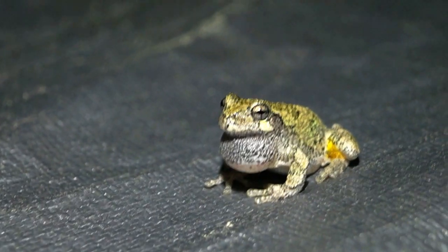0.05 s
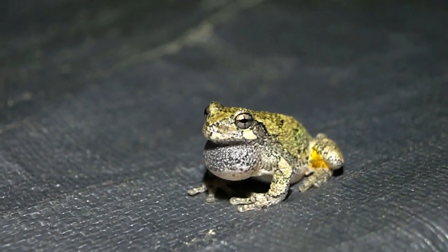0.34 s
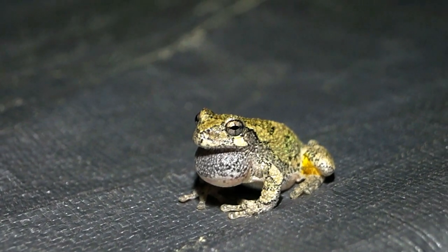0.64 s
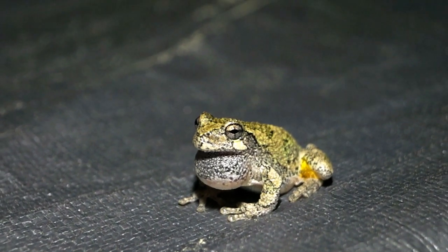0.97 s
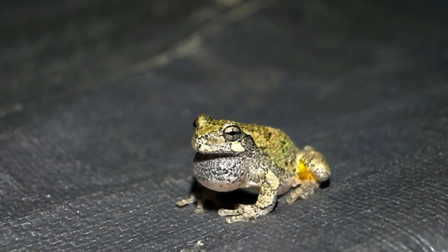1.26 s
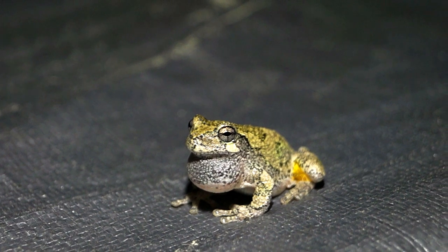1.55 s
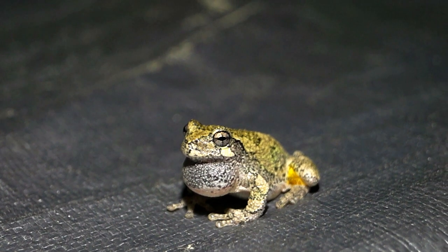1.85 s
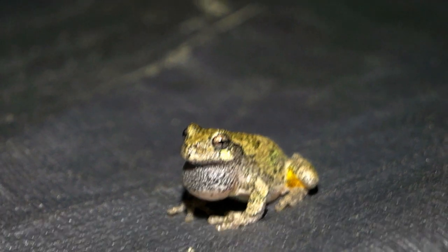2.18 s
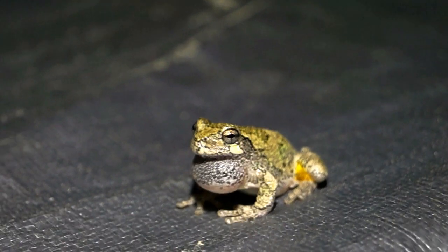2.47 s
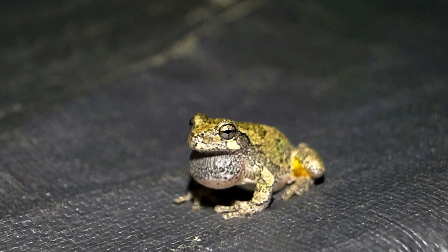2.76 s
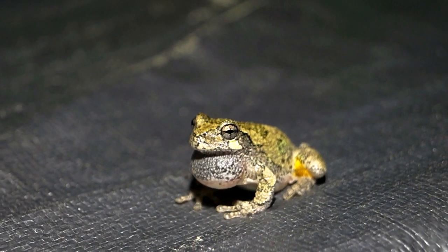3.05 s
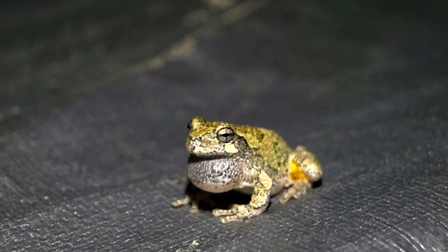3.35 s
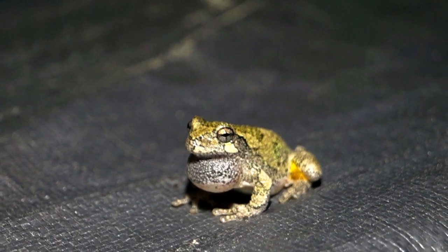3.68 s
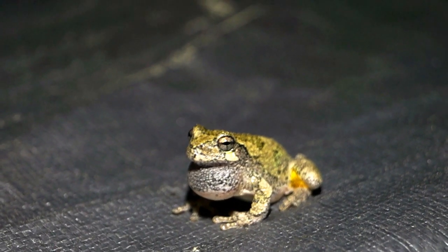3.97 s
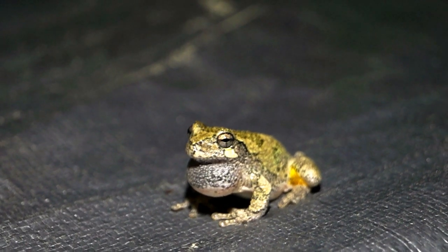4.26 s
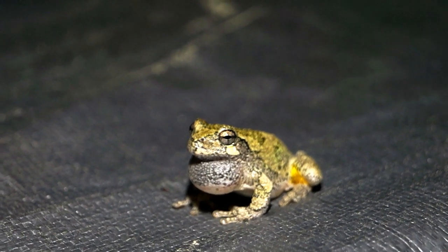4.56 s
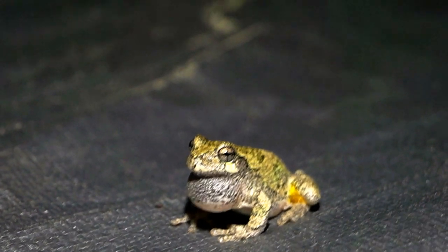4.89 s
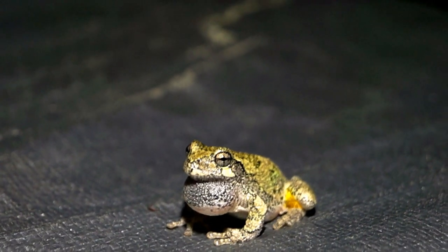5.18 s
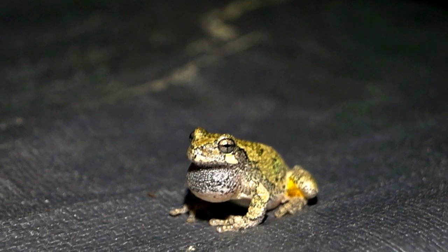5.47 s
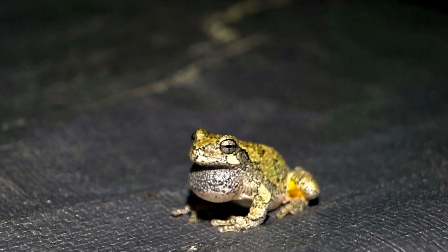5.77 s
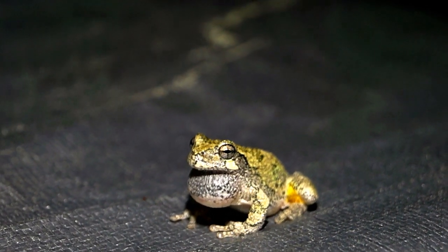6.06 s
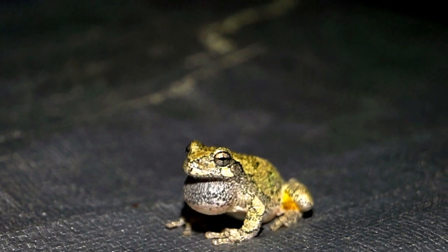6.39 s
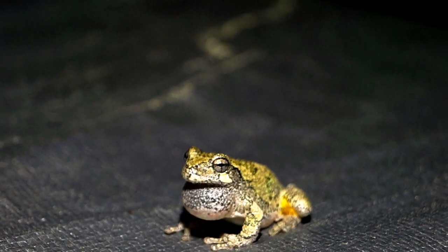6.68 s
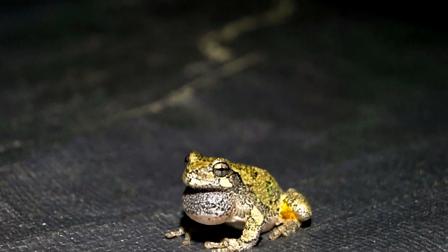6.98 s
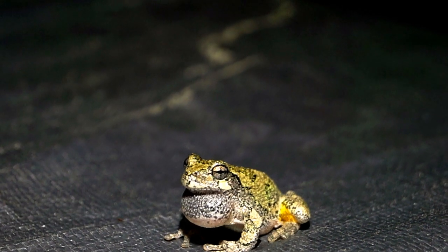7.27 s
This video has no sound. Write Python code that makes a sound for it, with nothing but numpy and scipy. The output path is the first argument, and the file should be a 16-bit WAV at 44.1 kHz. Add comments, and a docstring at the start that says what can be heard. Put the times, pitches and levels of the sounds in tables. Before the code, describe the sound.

Outdoors at night, a handheld microphone picks up three tree frogs taking turns with loud, pulsing trills, each about half a second long, with a slight echo from the trees. Soft handling thumps come early on. Later a small splash sounds as a toad begins a long, even, whistling trill behind the frogs, and a second plop follows near the end. Distant frogs, quiet air and a faint motor fill the gaps.

```python
"""Three gray tree frogs trill at night by the water. Each pulse is a rising chirp of the vocal cords,
coloured by the throat sac and echoed by things close by. Past the middle a toad starts a long, fast
trill and something plops twice in the water. Behind them are night air, a far motor, frog calls ringing
in the woods and the low rumble of a hand holding a camera. The yard and the trees add a faint tail."""
import sys
import numpy as np
from scipy import signal
from scipy.fft import rfft, irfft, next_fast_len
from scipy.io import wavfile
from scipy.ndimage import uniform_filter1d

SR = 44100
rng = np.random.default_rng(int(sys.argv[2]) if len(sys.argv) > 2 else 0)


def unload_wav(signal):
    """Save mono or channel-first audio to the path in sys.argv[1] as 16-bit WAV at rate SR, clipped to [-1, 1]."""
    wavfile.write(
        sys.argv[1],
        SR,
        np.round(np.clip(np.atleast_2d(signal).T, -1, 1) * 32767).astype(np.int16),
    )


N = 332073
TIME = np.arange(N) / SR


def amp(db):
    return 10 ** (np.asarray(db) / 20)


def unit(x):
    return x / np.sqrt(np.mean(x ** 2) + 1e-20)


def along(points, hz):
    """Read a table of (frequency, value) rows at any frequency."""
    freqs, values = np.transpose(points)
    return np.interp(np.log(hz + 1), np.log(freqs + 1), values)


def wobble(per_s):
    """A smooth curve through per_s random values a second."""
    count = int(N * per_s / SR) + 4
    curve = signal.resample(rng.standard_normal(count), 8 * count)
    return np.interp(TIME * per_s * 8, np.arange(len(curve)), curve)


def filtered(x, response):
    """Scale each frequency of x by response(hz)."""
    size = next_fast_len(N + SR // 4)
    return irfft(rfft(x, size) * response(np.fft.rfftfreq(size, 1 / SR)), size)[..., :N]


def held(rows, rise_s, fade_db_per_s):
    """Loudness that rises, holds and dies away for each row."""
    return sum(amp(db - fade_db_per_s * np.maximum(TIME - end, 0))
               * np.clip((TIME - start) / rise_s, 0, 1) for start, end, db in rows)


def swell(peak_s, half_s):
    """A bell-shaped rise and fall in loudness."""
    return np.exp(-np.minimum(((TIME - peak_s) / half_s) ** 2, 50))


def blips(rows):
    """Soft, very short tones."""
    return sum(amp(db) * swell(s, half) * np.cos(2 * np.pi * hz * (TIME - s))
               for s, db, hz, half in rows)


# How alike the two ears hear noise: frequency_hz, likeness (1 = the same)
EAR_LIKENESS = [(60, 0.51), (250, 0.6), (700, 0.18), (3000, 0.071), (10000, .05)]
def noise(spectrum):
    """Stereo noise, more alike between the ears in the bass."""
    def shape(hz):
        angle = np.arccos(along(EAR_LIKENESS, hz)) / 2
        return amp(along(spectrum, hz)) * [np.cos(angle), np.sin(angle)]
    shared, opposite = filtered(rng.standard_normal((2, N)), shape)
    return unit(np.array([shared + opposite, shared - opposite]))


# The tone colour of the air: frequency_hz, gain_db
AIR_COLOUR = [(25, -22), (50, -10.5), (110, -4), (260, -1), (330, -1), (400, -11.5), (560, -6.5),
              (1000, -7), (1500, -13.5), (2100, -12.5), (2900, -20.5), (4000, -19.5), (6000, -25.5),
              (15800, -33)]
def night_air():
    """A soft rush that wavers and slowly grows."""
    level_db = -54 + .3 * TIME + .5 * wobble(5.7)
    return amp(level_db) * noise(AIR_COLOUR)


# The tones in the hum: pitch_hz, level_db
MOTOR_TONES = [(107.7, -68.5), (236.9, -61), (473, -62.5), (588, -65.5), (647, -63.5), (705.2, -71)]
def far_motor():
    """A motor hums in wavering tones, a little to the left."""
    hum = sum(amp(db + 1.7 * wobble(3.21)) * np.sin(2 * np.pi * hz * TIME + .9 * wobble(8))
              for hz, db in MOTOR_TONES)
    return hum * amp([[.8], [-.8]])


# Swells of the ring: start_s, end_s, level_db
RING_SWELLS = [(0, .9, -60.5), (1.1, 1.5, -65.5), (2.3, 2.7, -62), (3.55, 3.66, -47.5), (3.95, 4.25, -59.5)]
# Its tone colour: frequency_hz, gain_db
RING_COLOUR = [(700, -45), (1050, -11), (1450, -26.5), (1800, -15), (2000, 0), (2200, -9.5), (2500, -25),
               (4000, -55.5)]
def ring_in_woods():
    """Swells of a soft high ring: far frogs, and nearby trills lingering in the woods."""
    level = amp(-71) + held(RING_SWELLS, rise_s=.08, fade_db_per_s=55.5)
    return level * amp(1.4 * wobble(53)) * noise(RING_COLOUR)


def chirp(shape, effort_db, pitch_ratio, shorten, rasp):
    """One pulse of the vocal cords. A weak push of air is duller and, with shorten, briefer."""
    times, *columns = np.transpose(shape)
    stretch = amp(shorten * min(effort_db, 0))
    brightness = amp(-(effort_db / 4.8) ** 2)
    offsets = np.arange(int(times[0] * stretch * SR), int(times[-1] * stretch * SR))
    smooth = lambda x: uniform_filter1d(x, size=48)
    curves = [np.interp(offsets / SR / stretch, times, column) for column in columns]
    hz, base_db, octave_db, overtones_db = smooth(np.array(curves))
    hz = hz * pitch_ratio
    phase = 2 * np.pi * np.cumsum(hz) / SR
    tone = amp(base_db) * np.sin(phase) + brightness * amp(octave_db) * np.sin(2 * phase)
    # the cords flutter, which smears the high overtones
    flutter = rasp * unit(smooth(smooth(rng.standard_normal(len(offsets)))))
    multiples = np.arange(3, 15)[:, None]
    waves = (multiples * hz < SR / 2) * np.sin(multiples * (phase + flutter))
    overtones = brightness * amp(overtones_db) * waves.sum(axis=0)
    soft_edges = signal.windows.tukey(len(offsets), .15)
    return offsets, amp(effort_db) * np.array([tone, overtones]) * soft_edges


def trill(pulses, pitch_ratios, shape, sac, shorten, rasp):
    """A string of chirps whose overtones ring in the throat sac."""
    track = np.zeros((2, N + SR))
    for (peak_s, effort_db), ratio in zip(pulses, pitch_ratios):
        offsets, waves = chirp(shape, effort_db, ratio, shorten, rasp)
        track[:, round(peak_s * SR) + offsets] += waves
    tone, overtones = track[:, :N]
    return tone + filtered(overtones, lambda hz: amp(along(sac, hz)))


def frog_voice(trills, shape, sac, swell_curve, shorten, rasp, scatter, sag_per_db):
    """Each trill opens softly and a little flat, swells, then slows as the frog tires."""
    tire_db_per_s, early_s_per_db = 1.22, .0002  # a weak pulse peaks early
    pulses = []
    for start, count, gap, growth, last_delay, full_db, softer_db, swell_pulses in trills:
        k = np.arange(round(count))
        elapsed = gap * k + growth * k * (k - 1) / 2 + last_delay * (k == k[-1])
        weak_db = softer_db * np.exp(-(k / swell_pulses) ** swell_curve)
        peak_s = start + elapsed - early_s_per_db * weak_db
        pulses += zip(peak_s, full_db - weak_db - tire_db_per_s * elapsed)
    effort_db = np.transpose(pulses)[1]
    pitch_ratios = 1 + scatter * rng.standard_normal(len(pulses)) + sag_per_db * effort_db
    return trill(pulses, pitch_ratios, shape, sac, shorten, rasp)


def at_ears(voice, echoes, side, left_lag_s, sway_s):
    """A voice at both ears, with close echoes that drift as the camera sways."""
    drift = sway_s * wobble(2)
    bounce = lambda delay, db: amp(db) * np.interp(TIME - delay - drift, TIME, voice)
    left = voice + sum(bounce(delay, db) for delay, db, _, _ in echoes)
    right = voice + sum(bounce(delay, db) for _, _, delay, db in echoes)
    ears = np.array([[.5], [-.5]])
    lag = lambda hz: np.exp(-2j * np.pi * hz * left_lag_s * ears)
    return filtered(np.array([left, right]), lambda hz: amp(along(side, hz) * ears) * lag(hz))


# When the frog calls: start_s, pulse_count, first_gap_s, gap_growth_s, last_pulse_delay_s,
# full_effort_db, opening_softer_db, pulses_to_swell
RIGHT_TRILLS = [(.1011, 15, .04224, .00047, 0.0024, -1.205, 13, 1.1),
                (3.0172, 14, .04185, .0005, 0, -.9, 17.5, 1.1), (7.497, 1, .042, 0, 0, -0.95, 14.5, 1.1)]
# One chirp: time_from_peak_s, pitch_hz, base_tone_db, octave_db, overtones_db
RIGHT_CHIRP = [(-.025, 830, -39, -57, -79), (-.019, 860, -34, -31.5, -53.5),
               (-.013, 910, -32.5, -26, -51.5), (-.008, 975, -23, -25.5, -46.5),
               (-.003, 1016, -23.5, -24.5, -42.5), (0, 1130, -21.5, -25.5, -42),
               (.003, 1140, -33, -46.5, -70)]
# How the throat sac colours the overtones: frequency_hz, gain_db
RIGHT_SAC = [(2500, -6.5), (3300, 4.5), (4400, -23), (4850, -9.5), (5300, -24), (6000, -27), (6700, -12),
             (7150, -1.5), (7500, -16), (7900, -33), (11000, -36), (11700, -16), (13000, -36)]
# Echoes off things close by: left_delay_s, left_db, right_delay_s, right_db
RIGHT_ECHOES = [(0.00443, -14.5, 0.00439, -10), (0.00697, -5, 0.0043, -19), (0.00742, -11.5, 0.012, -12),
                (0.0208, -10, 0.026, -16.5), (0.028, -9, 0.03293, -16)]
# Which ear hears more: frequency_hz, left_minus_right_db
RIGHT_SIDE = [(1000, -5), (2000, -7), (7000, -7)]
def right_frog():
    """The frog on the right gives two long trills and one last chirp."""
    voice = frog_voice(RIGHT_TRILLS, RIGHT_CHIRP, RIGHT_SAC, swell_curve=.94,
                       shorten=.35, rasp=.069, scatter=.0078, sag_per_db=.0023)
    return at_ears(voice, RIGHT_ECHOES, RIGHT_SIDE, left_lag_s=.00004, sway_s=.00002)


# The near frog's five tables, with the same columns as the right frog's
NEAR_TRILLS = [(.302, 1, .048, 0, 0, 0, 17, .7), (.3484, 9, .04796, .00051, 0, 0, 22, .6),
               (1.7635, 8, .04595, .0009, 0, -.5, 10, .4), (4.2497, 9, .04352, .00112, 0, .2, 21, .66),
               (6.2224, 9, .04549, .00083, 0, .2, 20, .4)]
NEAR_CHIRP = [(-.025, 794, -42, -33, -58), (-.019, 961.6, -27, -17, -52), (-.013, 1030, -13.5, -23.5, -45),
              (-.008, 1140, -20, -14.5, -34), (-.003, 1231, -16.5, -25.5, -34), (0, 1288, -8.5, -19.5, -41),
              (.003, 1445, -18, -37.5, -56.5), (.005, 1533, -41, -39.5, -68.5)]
NEAR_SAC = [(2500, -0.5), (3000, -2.5), (3300, -4), (3530, 6.5), (3850, -13), (4080, -11.5), (4400, -23.5),
            (4700, -22), (4900, -17), (5200, -30), (8000, -36.5), (9000, -33), (9450, -22), (10100, -38),
            (15000, -43)]
NEAR_ECHOES = [(0.00197, -9, 0.002853, -8), (0.00356, -37.5, 0.0066, -3), (0.007, -17, 0.00787, -5.5),
               (0.014, -14, 0.01005, -18), (0.0159, -21, 0.012, -10.5)]
NEAR_SIDE = [(900, 4), (1300, 12), (2200, 0), (3500, 1.5)]
def near_frog():
    """The closest frog gives four short trills; each loud pulse makes the recorder thump faintly."""
    voice = frog_voice(NEAR_TRILLS, NEAR_CHIRP, NEAR_SAC, swell_curve=1.05,
                       shorten=.25, rasp=.11, scatter=.0092, sag_per_db=.005)
    thump = amp(-32) * uniform_filter1d(uniform_filter1d(np.abs(voice), size=220), size=130)
    return at_ears(voice, NEAR_ECHOES, NEAR_SIDE, left_lag_s=.000015, sway_s=.00003) + thump


# Shifts of grip: start_s, end_s, level_db
GRIPS = [(.73, 1.2, -59.5), (1.33, 1.84, -56)]
# The tone colour of the rumble: frequency_hz, gain_db
RUMBLE_COLOUR = [(20, -11), (60, 2), (110, -3.5), (200, -11.5), (400, -36.5), (1000, -72.5)]
# Bumps of the hand: peak_s, level_db, pitch_hz, half_length_s
BUMPS = [(1.135, -44, 103, 0.011), (1.545, -33.5, 91, 0.0045), (1.77, -37, 104, 0.007),
         (1.865, -36, 138.2, 0.0067), (4.015, -43, 101, 0.0095)]
def hand_on_camera():
    """A hand rumbles faintly at rest, more as it shifts, and bumps the camera."""
    level = amp(-84) + held(GRIPS, rise_s=.07, fade_db_per_s=260.5)
    return level * amp(4.5 * wobble(30)) * noise(RUMBLE_COLOUR) + blips(BUMPS)


# The left frog's five tables, with the same columns as the right frog's
LEFT_TRILLS = [(1.604, 3, .043, .001, 0.00074, -16, 4.1, .6),
               (1.7375, 15, .05, .00006, 0.0082, -0.6, 13, 2.2)]
LEFT_CHIRP = [(-.025, 795, -48.5, -45, -51.5), (-.019, 865.5, -37, -22.5, -30.5),
              (-.013, 966, -24, -22.5, -35.5), (-.008, 1013, -20, -10.5, -39),
              (-.003, 1062, -24.5, -9, -28.5), (0, 1223, -19, -18.5, -32.5),
              (.003, 1186, -24.5, -30.5, -70)]
LEFT_SAC = [(2500, 1), (3450, -2), (4000, -22.5), (4250, -12), (4900, -30), (5800, -21.5), (6800, -37.5),
            (8000, -14.5), (8600, -37), (10700, -44), (11350, -25.5), (12500, -42.5)]
LEFT_ECHOES = [(0.00148, -22, 0.00235, -14.5), (0.00568, -26.5, 0.00503, -15.5),
               (0.00964, -20.5, 0.00859, -8), (0.03263, -47.5, 0.00999, -14.5),
               (0.03286, -29.5, 0.03271, -37.5)]
LEFT_SIDE = [(1000, 7.6), (2100, 8.8), (8000, 6.2)]
def left_frog():
    """The frog on the left leads into one long trill with three soft chirps."""
    voice = frog_voice(LEFT_TRILLS, LEFT_CHIRP, LEFT_SAC, swell_curve=2.1,
                       shorten=.16, rasp=.088, scatter=.0068, sag_per_db=.005)
    return at_ears(voice, LEFT_ECHOES, LEFT_SIDE, left_lag_s=.000008, sway_s=.00002)


# The toad's chirp, sac, echoes and side, with the same columns as the right frog's
TOAD_CHIRP = [(-.005, 1610, -3.5, -49, -64), (-.003, 1647, 6.5, -32, -34.5),
              (-.001, 1658, 9.5, -27.5, -35.5), (.001, 1638, 8, -30.5, -32),
              (.003, 1601, 0.5, -18.5, -47.5), (.005, 1200, -10, -42.5, -59)]
TOAD_SAC = [(4800, 1.5), (5400, -12.5), (6400, -18.5), (7800, -10), (10000, -20.5), (14000, -27.5)]
TOAD_ECHOES = [(.0085, -7, .0079, -11), (0.0108, -5.5, .0122, -11.5)]
TOAD_SIDE = [(1600, 2.1), (3200, .5)]
def toad():
    """Short whistles that droop at their ends; the trill swells, slides up to pitch and slows."""
    start_s, swell_s, slide_s, slowing_s = 4.7012, .22, .15, 1.6866
    first_per_s, settled_per_s, grow_db_per_s = 60.113, 49.212, 1
    age = np.maximum(TIME - start_s, 0)
    rate = settled_per_s + (first_per_s - settled_per_s) * np.exp(-age / slowing_s)
    cycles = np.cumsum(rate * (age > 0)) / SR
    beats = np.flatnonzero(np.diff(np.ceil(cycles)))
    time_jitter, effort_jitter, pitch_jitter = rng.standard_normal((len(beats), 3)).T
    pulses = zip(TIME[beats] + .00007 * time_jitter, 1.26 * effort_jitter)
    pitch_ratios = (.99 - .165 * np.exp(-age[beats] / slide_s)) * (1 + .0055 * pitch_jitter)
    level_db = -34 - 18 * np.exp(-age / swell_s) + grow_db_per_s * age
    voice = amp(level_db) * trill(pulses, pitch_ratios, TOAD_CHIRP, TOAD_SAC, shorten=0, rasp=.15)
    return at_ears(voice, TOAD_ECHOES, TOAD_SIDE, left_lag_s=.00001, sway_s=.00014)


# Small splashes: peak_s, level_db, half_length_s
SPLASHES = [(4.703, -43.5, 0.0084), (4.714, -35, 0.0059), (4.737, -47, 0.011), (7.002, -47.5, 0.018),
            (7.013, -52.5, 0.025)]
# Their tone colour: frequency_hz, gain_db
SPLASH_COLOUR = [(100, -24), (400, -2), (1200, -2), (2200, 0), (4500, -6), (5500, -23), (7000, -13),
                 (9000, -31), (15000, -39.5)]
# Their plops: peak_s, level_db, pitch_hz, half_length_s
PLOPS = [(4.735, -41.5, 544, 0.01), (7.001, -34, 544, 0.0054), (7.017, -37.5, 588, 0.015)]
def water():
    """Something splashes twice, each time with a hollow plop."""
    level = sum(amp(db) * swell(s, half) for s, db, half in SPLASHES)
    return level * noise(SPLASH_COLOUR) + blips(PLOPS)


def reverb(x, fade_times, delay_s):
    """A wash of echoes in which each frequency dies at its own speed."""
    hz, t, spectrum = signal.stft(rng.standard_normal((2, SR)), SR, nperseg=256)
    fade = amp(-60 * t / along(fade_times, hz)[:, None])
    tail = signal.istft(spectrum * fade, SR, nperseg=256)[1]
    late = np.pad(x.mean(axis=0), (int(delay_s * SR), 0))
    return signal.fftconvolve(late[None], tail / np.linalg.norm(tail[0]), axes=1)[:, :N]


# How long the yard and the trees ring: frequency_hz, fade_s (time to drop 60 dB)
YARD_FADE = [(500, 0.12), (2000, 0.28), (4000, 0.053), (10000, 0.078)]
TREES_FADE = [(500, .6), (1100, 0.62), (2100, 0.91), (3500, 0.2), (10000, 0.28)]
def yard_and_trees(close, farther):
    """The yard answers quickly, the trees later, returning more of the farther sound."""
    yard = amp(-21) * reverb(close + farther, YARD_FADE, delay_s=.006)
    trees = amp(-28.5) * reverb(close + amp(4) * farther, TREES_FADE, delay_s=.04)
    return yard + trees


def scene():
    """The callers and the water, their echoes, and the night behind them."""
    background = night_air() + far_motor() + ring_in_woods()
    farther = right_frog()
    close = near_frog() + left_frog() + toad() + water()
    return background + close + farther + yard_and_trees(close, farther) + hand_on_camera()


def record(dry):
    """The camera thins the deepest bass and cuts the highest treble."""
    bass_hz, top_hz = 15, 15800
    return filtered(dry, lambda hz: (hz < top_hz) * hz / (hz + bass_hz))


dry = scene()
out = record(dry)
unload_wav(out)
```